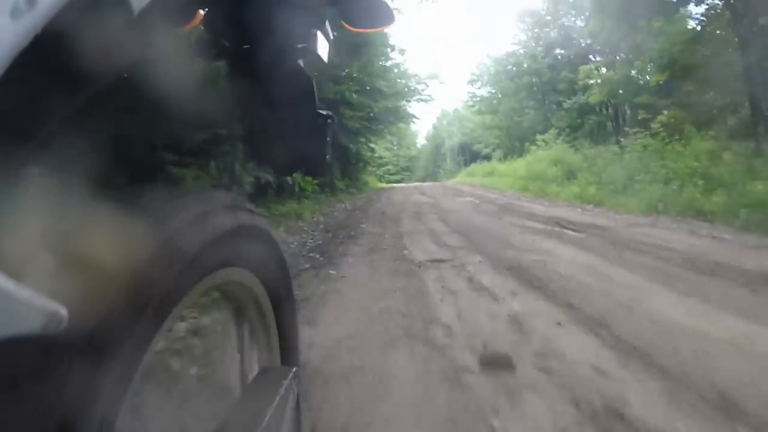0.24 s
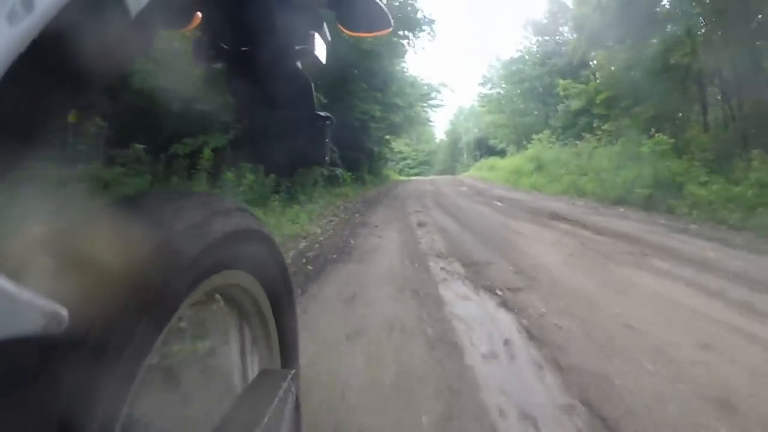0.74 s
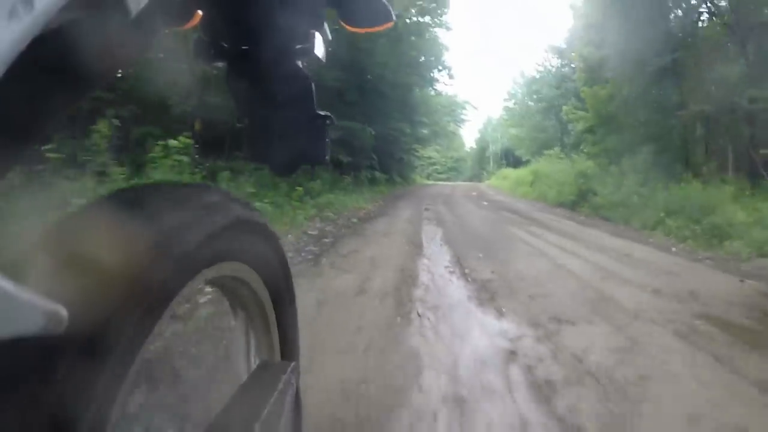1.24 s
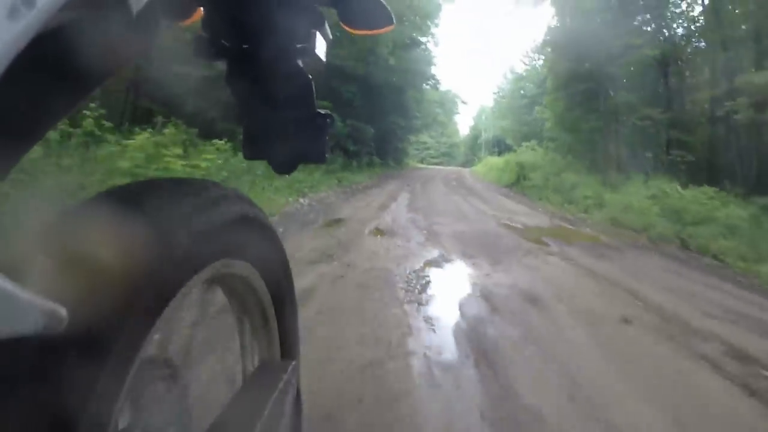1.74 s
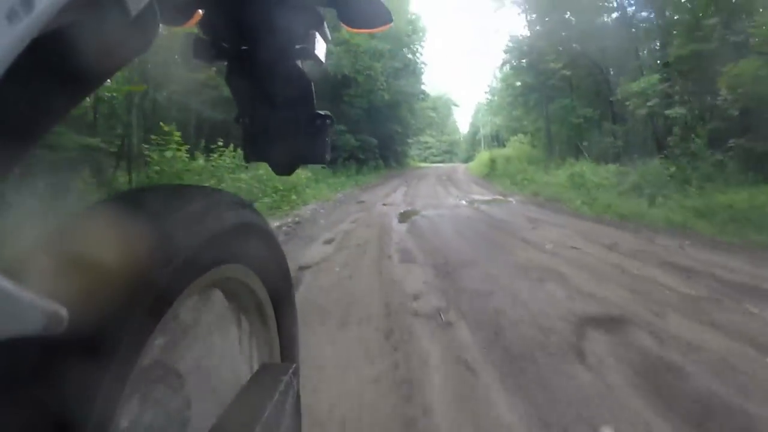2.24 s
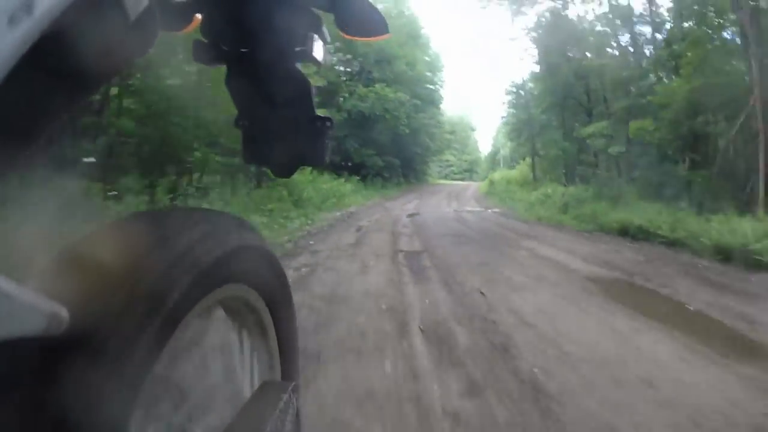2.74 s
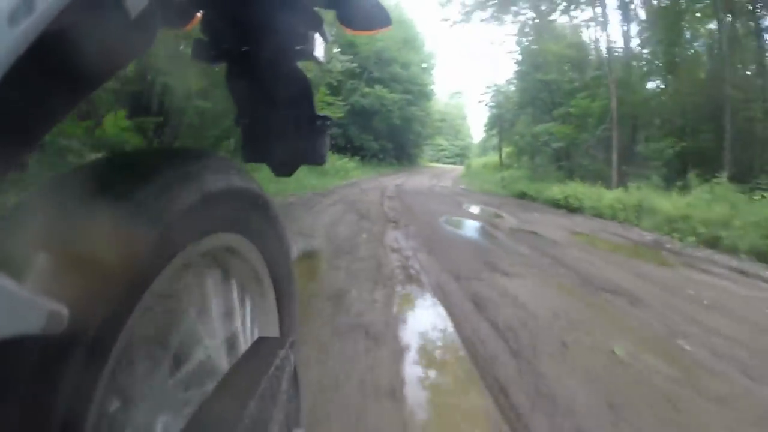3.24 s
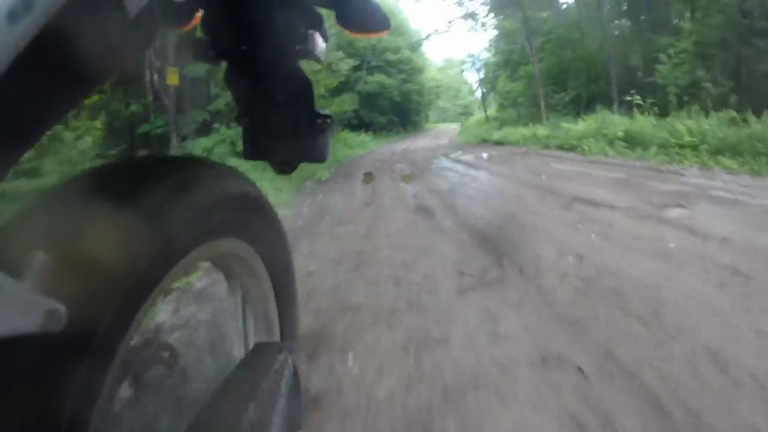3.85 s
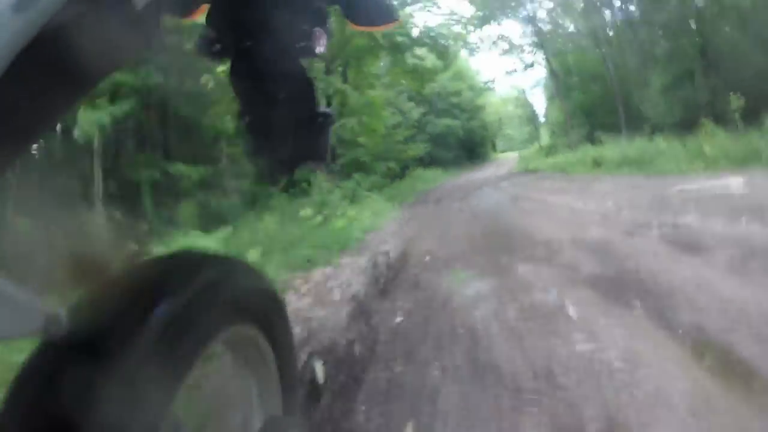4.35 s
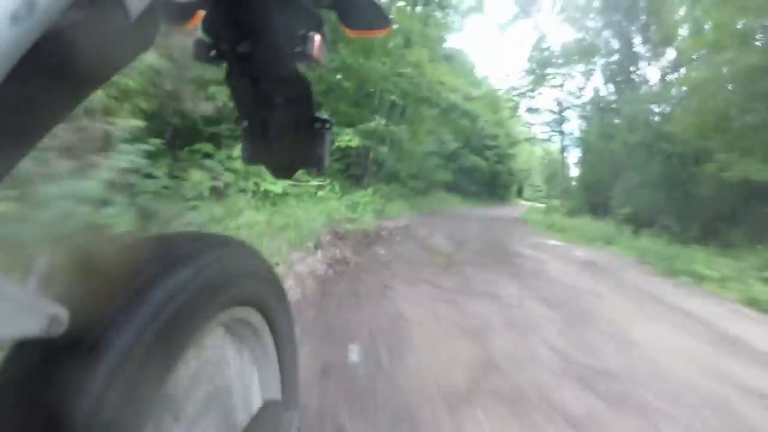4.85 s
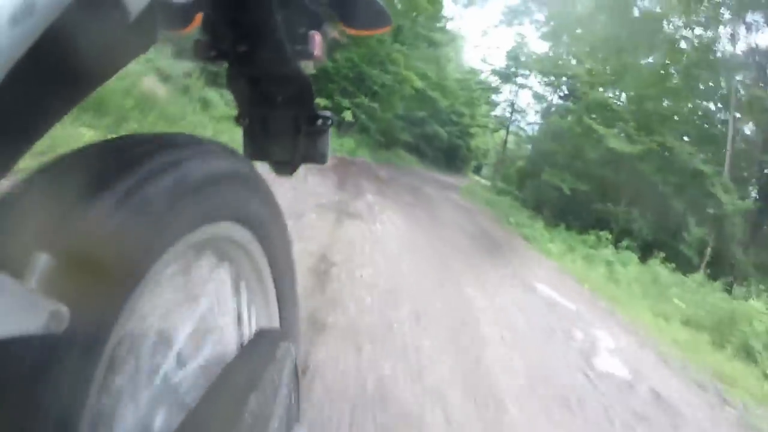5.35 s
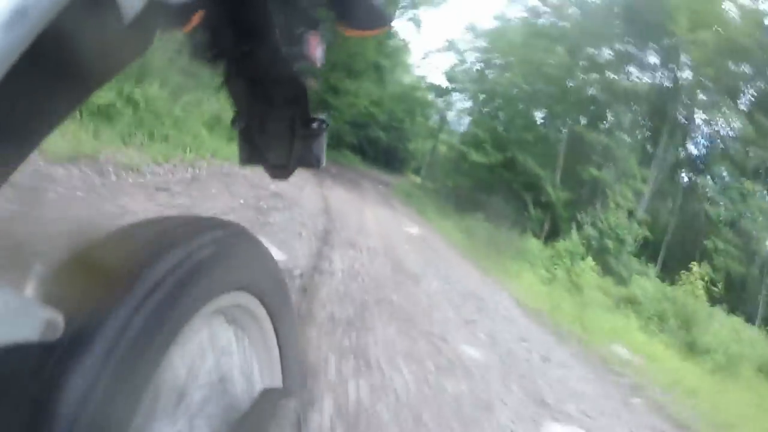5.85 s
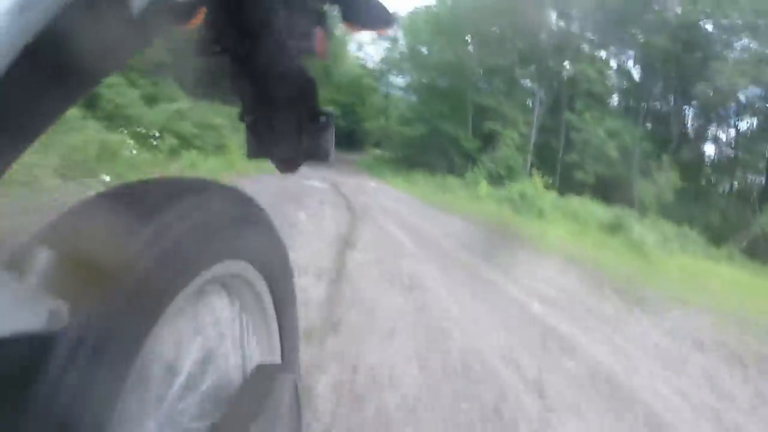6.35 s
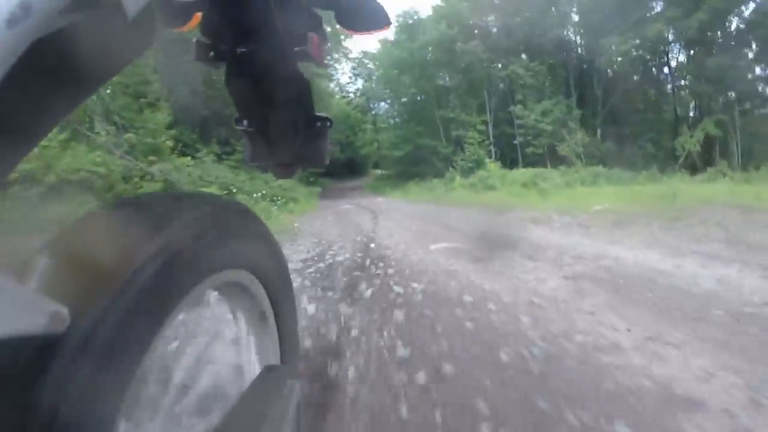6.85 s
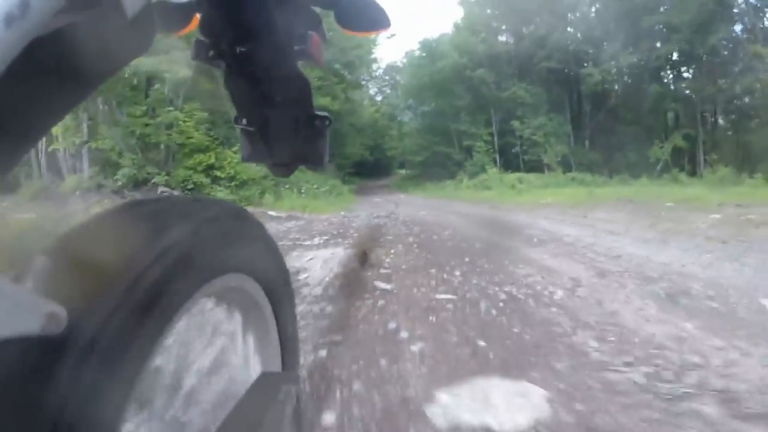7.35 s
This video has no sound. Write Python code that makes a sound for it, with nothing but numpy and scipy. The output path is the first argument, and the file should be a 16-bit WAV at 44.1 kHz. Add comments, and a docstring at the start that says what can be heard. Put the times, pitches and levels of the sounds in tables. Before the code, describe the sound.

Close, boxy motorcycle growl with metallic rattle holds steady, leaps up, drops, climbs again and eases, over low road rumble and stone clicks.

```python
"""Motorcycle on a dirt road

A camera in a closed housing, clamped to the motorcycle, hears the engine mostly through its mount.
Clean tones at multiples of the shaft speed carry a knock each turn and a rattle of loose parts.
The housing colours the knock and rattle with resonances; the tones are sines, the rattle bursts of noise.
Stones crack against the frame, and filtered noise and a slow sway make the rumble underneath."""
import sys
import numpy as np
from scipy import signal
from scipy.fft import rfft, irfft, next_fast_len
from scipy.io import wavfile
from scipy.ndimage import uniform_filter1d, map_coordinates

SR = 44100
rng = np.random.default_rng(int(sys.argv[2]) if len(sys.argv) > 2 else 0)


def int16_out(signal):
    """Quantize to a 16-bit WAV file."""
    q = np.round(np.clip(np.atleast_2d(signal).T, -1, 1) * 32767)
    wavfile.write(sys.argv[1], SR, q.astype(np.int16))


N = 335160

# How fast the engine shaft spins. Each row: time in seconds, speed in turns per second.
SHAFT_SPEED = [(0.0, 38.5), (0.17, 37.24), (0.32, 35.2), (0.49, 36.73), (0.78, 37.3), (1.33, 35.88),
               (1.48, 37.72), (1.61, 36.77), (2.9, 39.16), (3.17, 41.74), (3.37, 40.86), (3.49, 42.44),
               (3.79, 41.2), (3.94, 44.67), (4.06, 43.83), (4.23, 52.25), (4.34, 61.8), (4.42, 65.6),
               (4.51, 67.7), (4.59, 62.36), (4.64, 59.18), (4.76, 44.15), (4.82, 42), (5.1, 41.71),
               (5.25, 49.67), (5.35, 49.4), (5.67, 53.22), (5.92, 62.83), (6.22, 62.4), (6.48, 51.2),
               (6.69, 50.2), (6.99, 45.98), (7.28, 43.3), (7.6, 45.64)]
# How well the mount passes a low tone. Each row: frequency in Hz, gain in dB.
MOUNT_GAIN = [(74, -52), (88, -33.5), (100, -21), (114, -11.5), (127, -18.5), (141, -20), (151, -41),
              (166, -12), (183, -20), (205, -16), (225, -18.5), (248, -23.5), (273, -20.5), (305, -33.5),
              (400, -31)]
# Strength of the low tones (orders), on top of the mount gain.
# Each row: shaft speed in turns per second, then orders 2, 3, 4, 5 and 6 in dB.
ORDER_STRENGTH = [(35.6, 14, -0.5, 7.5, -6.5, -3.5), (39.4, .2, -1.4, 2, -9, 0),
                  (42.8, -6, -4, 1.5, -7, -1.5), (46.11, 3.5, -3, 2, -4.5, -2),
                  (52.39, -0.2, -27, 2.5, -19.5, -0.5), (59.81, 1.5, -13, 0.5, -3, 6.5),
                  (63.77, -2.5, -4, -0.5, -3, 3.5)]
# Rises and falls of three orders over time, some gradual and some quick.
# Each row: time in seconds, order 3 in dB, order 5 in dB, order 6 in dB.
ORDER_CHANGES = [(0, -0.5, 4, 2.5), (1.1, -1.5, 1.5, 0.5), (1.35, -3.5, 4, -3), (1.55, .3, -2.5, -6),
                 (2.9, 1.4, .5, -2.5), (4, 1, 5, -4), (4.8, 0, -1, -4), (6.1, 1, 7, -6), (6.75, 1, -7, 3),
                 (7, -22, -10, 4.5), (7.3, -3, -4, -8), (7.6, -10, -5, 2)]
# Lag of orders 2 to 6, each in cycles of its own tone.
ORDER_LAG = [0.042, 0.29, 0.21, 0.63, 0.35]
# Moments when the low orders fall away. Each row: time in seconds, change in dB, spread in seconds.
LULLS = [(4.722, -22, 0.017), (5.352, -13, 0.02), (5.516, -5, 0.02), (5.907, -3.5, 0.025),
         (6.484, -3, 0.045)]
# How hard the blows fall. Each row: time in seconds, growl level in dB (only its ups and downs are used).
GROWL = [(0.06, -21), (0.1, -23.5), (1.14, -22), (1.21, -21), (1.81, -22), (2.12, -21), (3.7, -24),
         (4.0, -20.5), (4.04, -24), (4.18, -19), (4.25, -23.5), (4.6, -21), (4.72, -28.5), (4.87, -23.5),
         (5.02, -24.5), (5.19, -21.5), (5.77, -26), (5.98, -20), (6.21, -20.5), (6.41, -30.5), (6.89, -24),
         (7.02, -19.5), (7.2, -25), (7.54, -23)]
# How hard loose parts clatter. Each row: time in seconds, tick level in dB before a small trim.
CLATTER = [(0.06, -40), (0.18, -42), (1.64, -41.5), (1.81, -44), (2.14, -41.5), (2.95, -41.5), (3.37, -39),
           (3.66, -43.5), (3.87, -39.5), (4.12, -39.5), (4.14, -34.5), (4.31, -43), (4.46, -33.5),
           (4.58, -38), (4.7, -51.5), (4.81, -41), (5.25, -38), (5.27, -44.5), (5.43, -39.5), (5.79, -46),
           (5.98, -38.5), (6.25, -39.5), (6.31, -50), (6.85, -40.5), (7.0, -35), (7.27, -43.5), (7.29, -41),
           (7.54, -39)]
# Four rows, for thump, knock, rattle and rasp. Each row: mean level in dB before later trims,
# dB for each dB of clatter, dB for each dB of growl, dB for each Hz of shaft speed.
LEVEL_RULES = [(-26.5, -0.04, 1.72, 0.1438), (-31.5, 0.9, 0.23, 0.14), (-26, 0.64, 0.32, -0.0042),
               (-32, 1.02, 0.12, -0.01)]
# Colour of the deep part of each blow. Each row: frequency in Hz, relative level in dB per Hz.
THUMP_COLOUR = [(200, -16.5), (270, 5), (330, -3.5), (400, -2), (500, -2), (570, -5), (700, -41)]
# Colour of the higher part of each blow. Each row: frequency in Hz, relative level in dB per Hz.
KNOCK_COLOUR = [(430, -45.5), (540, -12.5), (620, -10.5), (720, -4.5), (880, -7.5), (1050, -4.5),
                (1400, -52)]
# Resonances of housing and bracket. Each row: centre in Hz, width in Hz, height in dB.
HOUSING_PEAKS = [(402.3, 76, 9.5), (673, 160, 7.5), (1206, 36, 5.5), (1350, 27, 9.5), (1567, 120, 4.5),
                 (2423, 62, 4.5), (3130, 250, 8), (5650, 1100, 4.5)]
# Places in a turn where loose parts touch. Each row: place in the turn from 0 to 1, strength in dB.
CONTACTS = [(0, 3), (0.331, 1.5), (.52, 9), (0.778, -1)]
# Colour of the rattle's body. Each row: frequency in Hz, relative level in dB per Hz.
RATTLE_COLOUR = [(200, -26), (300, -13.5), (600, -12), (880, -11), (1100, -3), (1370, 0), (1700, -2),
                 (2000, -12), (2600, -40)]
# Colour of the rasp above it. Each row: frequency in Hz, relative level in dB per Hz.
RASP_COLOUR = [(1400, -35.5), (1850, -4), (2200, 3), (2800, -2), (3300, -4.5), (3900, -9.5), (5000, -72)]
# Colour of a panel that buzzes at high revs. Each row: frequency in Hz, relative level in dB per Hz.
BUZZ_COLOUR = [(1600, -33), (2050, 15), (2350, -19), (2900, -28.5)]
# Colour of the bright ticks. Each row: frequency in Hz, relative level in dB per Hz.
TICK_COLOUR = [(2120, -18), (3600, -2), (4720, -2.5), (5040, -8), (5790, -5), (6420, -8), (7240, -7.5),
               (8570, -16.5), (12500, -17), (15200, -98)]
# Stones thrown against the frame. Each row: time in seconds, starting level in dB before the band filter.
STONES = [(1.354, -20), (1.594, -29), (3.8516, -15), (4.1411, -21), (4.2783, -14), (5.3894, -16),
          (5.8531, -21), (6.0784, -24), (7.0881, -21)]
# Bumps in the road. Each row: time in seconds, added sway in dB, change of the blows in dB,
# change of orders 2 to 4 in dB.
BUMPS = [(.3, -24, 2, -5), (1.03, -32, -1, -21), (1.4, -30, 1.5, -1), (1.8, -30, -2.5, -1),
         (3.0, -26, 1, -4), (3.93, -41, 0.5, -1), (4.15, -40, 2.5, -1), (5.21, -34, 5.5, -5.5),
         (5.44, -43, 2.5, 1.5), (6.18, -33, 1, 0), (6.95, -34, 3, -8), (7.28, -28, -2, -3)]
# Colour of wind and tyre rumble. Each row: frequency in Hz, relative level in dB per Hz.
ROAD_COLOUR = [(15, -52), (40, 5), (70, 3.5), (150, 16.5), (300, 4.5), (500, -71)]

# the total level of the low tones is evened out towards this level, by this share
STEADY_DB, EVENED_SHARE = -14, 0.74
SWAY_S, LIFT_S, DIP_S = 0.085, 0.032, 0.02  # spread in seconds of each answer to a bump
SWAY_DB = -33  # steady sway, to which the bumps add
TOP_HZ = 15340  # nothing is kept from here up


def orders(turns, speed_hz, levels_db):
    """The mount swings at whole multiples of shaft speed; order 16 follows order 4 near a bracket resonance."""
    tones = np.zeros(N)
    for k, db in enumerate(levels_db):
        cycles = (k + 2) * turns - ORDER_LAG[k]
        tones += amp(db + 1.1 * wobble(15)) * np.cos(2 * np.pi * cycles)
    # loudest as order 16 passes 700 Hz
    near = 1 / (1 + ((16 * speed_hz - 700) / 70) ** 2)
    whine_db = levels_db[2] - 20 + 3 * wobble(7)
    whine = near * amp(whine_db) * np.cos(2 * np.pi * 16 * turns)
    return np.sqrt(2) * (tones + whine)  # a sine of rms 1 peaks at the root of 2


def low_levels(speed_hz):
    """Levels of orders 2 to 6: the mount's response, evened out towards a steady total, with dips and lulls."""
    at_hz, *strengths_db = np.transpose(ORDER_STRENGTH)
    levels_db = np.array([gain_db((k + 2) * speed_hz, MOUNT_GAIN) + np.interp(speed_hz, at_hz, db)
                          for k, db in enumerate(strengths_db)])
    levels_db[[1, 3, 4]] += curves(ORDER_CHANGES)  # orders 3, 5 and 6
    total_db = 10 * np.log10(np.sum(amp(levels_db) ** 2, axis=0))
    levels_db -= EVENED_SHARE * (total_db - STEADY_DB)
    levels_db += sum(db * bell(s, spread) for s, db, spread in LULLS)
    levels_db[:3] += sum(db * bell(s, DIP_S) for s, _, _, db in BUMPS)  # orders 2 to 4
    return levels_db


def knock(turns, speed_hz, thump_db, knock_db):
    """Blows each turn draw the higher orders, which swell at resonances and wander more the higher they are."""
    step = 64  # gains are worked out once every 64 samples
    sound = np.zeros(N)
    for k in range(7, 30):
        hz = k * speed_hz[::step]
        thump_gain = amp(thump_db[::step] + gain_db(hz, THUMP_COLOUR, HOUSING_PEAKS))
        knock_gain = amp(knock_db[::step] + gain_db(hz, KNOCK_COLOUR, HOUSING_PEAKS))
        gain = np.repeat(thump_gain + knock_gain, step)[:N]
        wander = amp(2.1 * wobble(5) + 0.11 * k * wobble(22))
        cycles = k * turns + 0.15 * wobble(2.5) + 0.0055 * k * wobble(25)
        sound += wander * gain * np.cos(2 * np.pi * cycles)
    # no two blows are alike: a rough share pulses once a turn
    pulse = 1 + 0.27 * np.cos(2 * np.pi * turns)
    noise = pulse * rng.standard_normal((2, N))
    rough = amp(thump_db) * coloured(noise[0], THUMP_COLOUR, HOUSING_PEAKS)
    rough += amp(knock_db) * coloured(noise[1], KNOCK_COLOUR, HOUSING_PEAKS)
    return amp(-8.2) * sound + amp(-10) * rough


def rattle(turns, speed_hz, swing, rattle_db, rasp_db, ticks_db):
    """Loose parts strike a few times a turn and as the mount swings far; contacts are short bursts of noise."""
    hits = sum(amp(db) * blows(turns, place, jitter=0.025, scatter_db=3.2) for place, db in CONTACTS)
    body = (1.66 + 0.55 * swing + burst(hits, 0.029)) * rng.standard_normal(N)
    ticks = (1.03 + 0.27 * swing + burst(hits, 0.016)) * rng.standard_normal(N)
    surge_db = 1.1 * wobble(16)  # the ticks swell and fade at random
    sound = amp(rattle_db - 0.51) * coloured(body, RATTLE_COLOUR, HOUSING_PEAKS)
    sound += amp(rasp_db - 1.43) * coloured(body, RASP_COLOUR, HOUSING_PEAKS)
    # the panel's buzz grows steeply with shaft speed
    sound += amp(rasp_db + 0.78 * (speed_hz - 71.5)) * coloured(body, BUZZ_COLOUR)
    return sound + amp(ticks_db - 1.25 + surge_db) * coloured(ticks, TICK_COLOUR, HOUSING_PEAKS)


def burst(hits, fall_s):
    """Each hit rises in 1.3 ms while fading at a rate of 60 dB in fall_s seconds; rms 1 overall."""
    t = np.arange(SR // 20) / SR
    shape = amp(-60 * t / fall_s) * np.minimum(t / 0.0013, 1)
    return unit(signal.fftconvolve(hits, shape)[:N])


def blows(turns, place, jitter, scatter_db):
    """One impulse each turn at a given place, with scatter in time and size."""
    whole = np.arange(1, int(turns[-1]))
    chance = rng.standard_normal((len(whole), 2))
    at = np.interp(whole + place + jitter * chance[:, 0], turns, np.arange(N))
    return np.bincount(at.astype(int), amp(scatter_db * chance[:, 1]), N)


def loads(speed_hz):
    """Levels of thump, knock, rattle, rasp and ticks; bumps change the first three."""
    ticks_db, = curves(CLATTER)
    growl_db, = curves(GROWL)
    # only the ups and downs around each mean count
    clatter, growl, revs = [c - c.mean() for c in (ticks_db, growl_db, speed_hz)]
    thump_db, knock_db, rattle_db, rasp_db = [db + a * clatter + b * growl + c * revs
                                              for db, a, b, c in LEVEL_RULES]
    lift_db = sum(db * bell(s, LIFT_S) for s, _, db, _ in BUMPS)
    return thump_db + lift_db, knock_db + 0.68 * lift_db, rattle_db + 0.42 * lift_db, rasp_db, ticks_db


def stones():
    """Each stone is a dry crack: noise that dies away within milliseconds, kept to a middle band."""
    cracks = np.zeros(N)
    t = np.arange(SR // 25) / SR
    for s, db in STONES:
        cracks[round(s * SR):][:len(t)] += amp(db - 60 * t / 0.011) * rng.standard_normal(len(t))
    band = signal.butter(2, [700, 4200], "band", fs=SR)
    return 1.26 * signal.lfilter(*band, cracks)


def road():
    """Wind and tyre rumble is filtered noise; bumps strengthen the mount's slowest sway."""
    t = np.arange(N) / SR
    sway = wobble(7.1) * np.sin(2 * np.pi * 31.5 * t)
    sway += wobble(10) * np.cos(2 * np.pi * 33.0 * t)
    size = amp(SWAY_DB) + sum(amp(db) * bell(s, SWAY_S) for s, db, _, _ in BUMPS)
    rumble = amp(-26) * coloured(rng.standard_normal(N), ROAD_COLOUR)
    return size * sway + rumble


def coloured(x, points, modes=()):
    """Filter x to a given colour without any sound ahead of its cause; rms 1."""
    m = 2 * next_fast_len(N // 2 + 4096)
    db = gain_db(np.fft.rfftfreq(m, 1 / SR), points, modes)
    # folding the cepstrum (the spectrum of the log gain) makes the filter act only forward in time
    cep = irfft(np.maximum(db, -90) * np.log(10) / 20, m)
    cep[1:m // 2] *= 2
    cep[m // 2 + 1:] = 0
    return unit(irfft(rfft(x, m) * np.exp(rfft(cep)), m)[:N])


def gain_db(hz, points, modes=()):
    """Gain in dB drawn through points on a log frequency axis, plus resonance peaks."""
    f, v = np.transpose(points)
    base = np.interp(np.log(hz + 1), np.log(f + 1), v)
    return base + sum(g / (1 + (2 * (hz - c) / w) ** 2) for c, w, g in modes)


def curves(rows):
    """One value per sample for each column after the time."""
    s, *cols = np.transpose(rows)
    return [np.interp(np.arange(N) / SR, s, c) for c in cols]


def wobble(rate):
    """A smooth random curve through rate random points a second."""
    points = rng.standard_normal(int(N * rate / SR) + 4)
    return map_coordinates(points, [np.arange(N) * rate / SR])


def bell(s, spread_s):
    """A smooth hump of height 1 around a moment."""
    return np.exp(-0.5 * ((np.arange(N) / SR - s) / spread_s) ** 2)


def amp(db):
    """Decibels to gain."""
    return 10 ** (np.asarray(db) / 20)


def unit(x):
    """Scale to rms 1."""
    return x / np.sqrt(np.mean(x ** 2) + 1e-20)


def scene():
    """Engine through the mount, with stones, over the road."""
    speed_hz, = curves(SHAFT_SPEED)
    turns = np.cumsum(speed_hz) / SR
    thump_db, knock_db, *rattle_db = loads(speed_hz)  # rattle_db also holds rasp and ticks
    shake = orders(turns, speed_hz, low_levels(speed_hz))
    size = np.sqrt(np.abs(uniform_filter1d(shake ** 2, size=2600)) + 1e-9)  # running rms
    swing = unit(np.maximum(shake / size - 0.7, 0))  # the far part of each swing to one side
    engine = shake + knock(turns, speed_hz, thump_db, knock_db)
    engine += rattle(turns, speed_hz, swing, *rattle_db)
    return (engine + stones() + road())[None]


def record(dry):
    """Peaks are rounded off; nothing is kept above the band limit."""
    soft = dry / (1 + np.abs(dry / 0.95) ** 4) ** (1 / 4)
    return irfft(rfft(soft) * (np.fft.rfftfreq(N, 1 / SR) < TOP_HZ), N)


dry = scene()
out = record(dry)
int16_out(out)
```